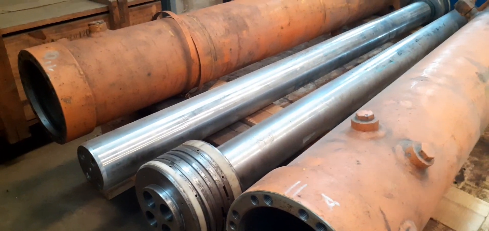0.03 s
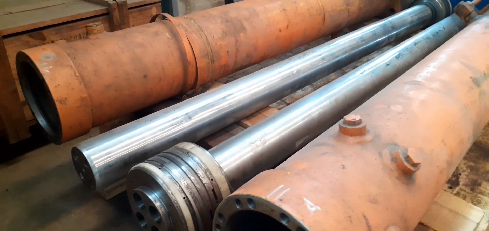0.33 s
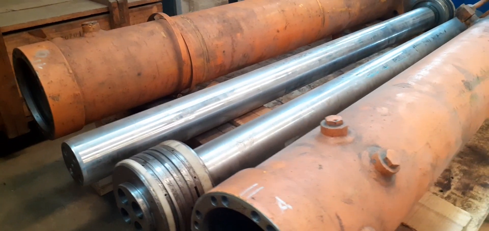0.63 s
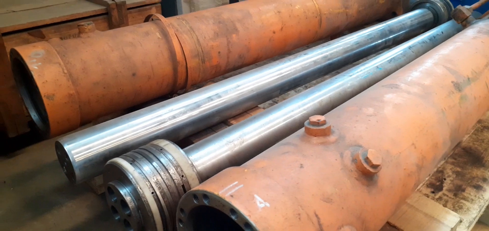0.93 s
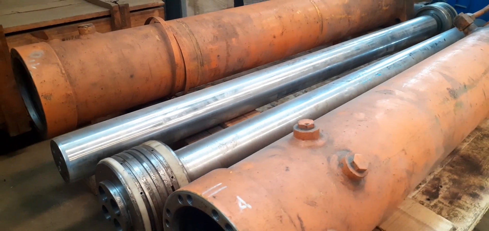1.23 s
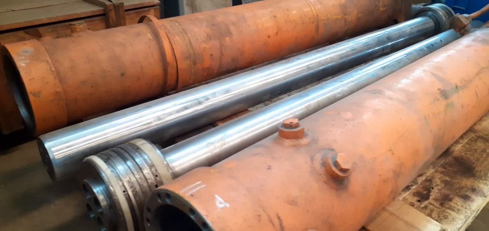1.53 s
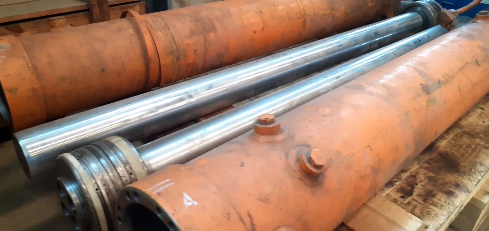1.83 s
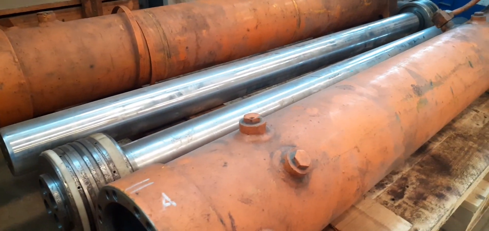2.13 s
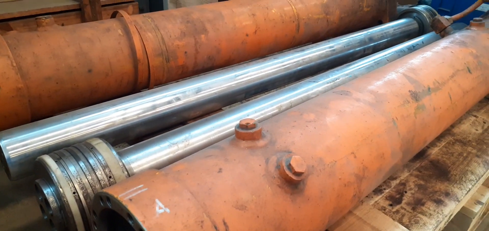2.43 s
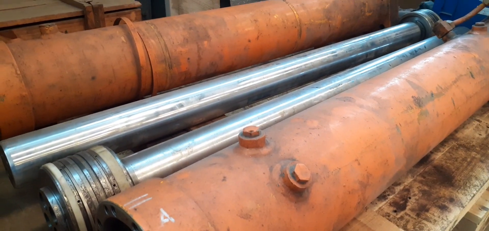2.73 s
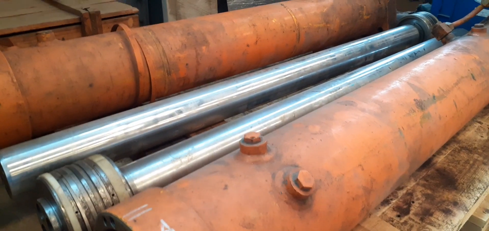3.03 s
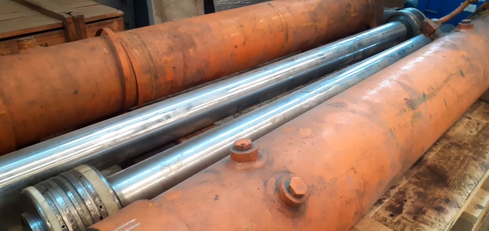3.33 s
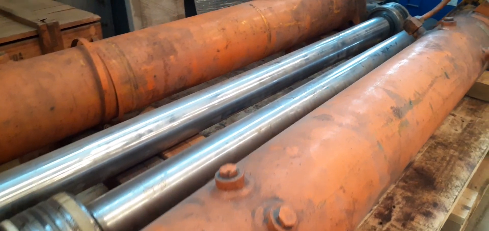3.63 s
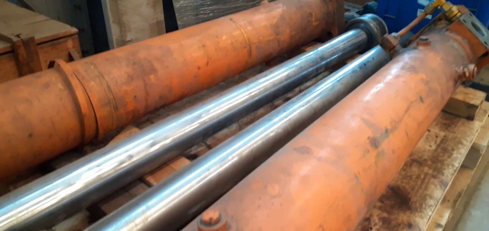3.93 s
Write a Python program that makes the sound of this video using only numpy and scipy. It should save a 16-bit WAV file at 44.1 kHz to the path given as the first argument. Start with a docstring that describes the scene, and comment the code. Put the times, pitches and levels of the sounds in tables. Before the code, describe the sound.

A low ventilation rumble runs for all four seconds in a metal workshop, wavering slightly and dipping briefly just after 2 seconds. Distant machines drone and motors hum with it, under faint air hiss, a weak fan tone and a thin high whine. A tiny tick sounds on the left at 0.2 seconds. Three very soft taps come from the right around 1.1 seconds, one from the left at 2.1.

```python
"""Metal workshop background

Ventilation rumbles in the hall's low resonances, air hisses above it, distant machines drone.
Motors hum, a fan sings its blade note, and a variable-speed drive whines near 4 and 8 kHz.
A tiny tick sounds at the left microphone port; three soft taps come from the right, one from the left."""
import sys
import numpy as np
from scipy.fft import rfft, irfft, next_fast_len
from scipy.io import wavfile
from scipy.ndimage import map_coordinates

SR = 44100
rng = np.random.default_rng(int(sys.argv[2]) if len(sys.argv) > 2 else 0)


def digitize_waveform(pressure):
    """Quantize a signal to 16-bit integers and store it at the path in sys.argv[1].

    Rows of a 2-D input are taken as channels; values are limited to [-1, 1].
    """
    field = np.atleast_2d(pressure).T
    bounded = np.clip(field, -1, 1)
    quanta = np.round(bounded * 32767).astype(np.int16)
    wavfile.write(sys.argv[1], SR, quanta)


N = 176400


def amp(db):
    """Decibels to gain."""
    return 10 ** (np.asarray(db) / 20)


def along(points, hz):
    """(hz, value) points read on a log axis."""
    knots_hz, values = np.transpose(points)
    return np.interp(np.log(hz + 1), np.log(knots_hz + 1), values)


def curve(points):
    """(time_s, value) points as one value per sample."""
    return np.interp(np.arange(N) / SR, *np.transpose(points))


def wobble(rate_hz):
    """Smooth random curve, rate_hz knots a second."""
    knots = rng.standard_normal(int(N * rate_hz / SR) + 4)
    return map_coordinates(knots, [np.arange(N) * rate_hz / SR], mode="nearest")


def filtered(x, response):
    """Apply a frequency response, with mirrored ends."""
    edge = SR // 4
    padded = np.pad(x, ((0, 0), (edge, edge)), mode="reflect")
    size = next_fast_len(padded.shape[1])
    hz = np.fft.rfftfreq(size, 1 / SR)
    return irfft(rfft(padded, size) * response(hz), size)[:, edge:edge + N]


def pan(pan_db):
    """Stereo gains; pan_db is left minus right."""
    return amp(np.array([[.5], [-.5]]) * pan_db)


# Left-right likeness at the microphone pair: freq_hz, correlation
COHERENCE = [(60, .97), (150, .95), (300, .92), (600, .8), (1200, .3), (3000, .3), (8000, .15), (15000, .1)]

def stereo_noise(gain):
    """Noise of rms 1 shaped by gain(hz); the bass is alike in both channels."""
    size = next_fast_len(N + SR // 2)
    hz = np.fft.rfftfreq(size, 1 / SR)
    angle = np.arccos(along(COHERENCE, hz)) / 2
    mid, side = rfft(rng.standard_normal((2, size))) * [np.cos(angle), np.sin(angle)]
    shaped = irfft(np.array([mid + side, mid - side]) * gain(hz), size)[:, :N]
    return shaped / np.sqrt(np.mean(shaped ** 2))


def fuzzy_tones(rows):
    """Tones blurred into narrow noise bands."""
    out = np.zeros((2, N))
    for pitch_hz, level_db, width_hz, pan_db in rows:
        band = stereo_noise(lambda hz: pan(pan_db) / (1 + ((hz - pitch_hz) / width_hz) ** 2) ** 1.46)
        out += amp(level_db) * band
    return out


# Stereo balance of the hall: freq_hz, pan_db
HALL_BALANCE = [(60, -3.5), (180, -0.6), (380, -5), (540, -0.5), (750, -5), (1000, -1.5), (1400, -5),
                (4000, -6.5), (8000, -4.5), (10000, -0.5), (12000, -9.5), (15000, -10.5)]

def hall_noise(spectrum):
    """Broad noise of rms 1, leaning right."""
    return stereo_noise(lambda hz: amp(along(spectrum, hz)) * pan(along(HALL_BALANCE, hz)))


# Rumble spectrum: freq_hz, relative_db
RUMBLE_SPECTRUM = [(20, -38), (31, -39), (40, -28.5), (50, -19), (65, -11.5), (80, -3), (95, -3),
                   (112, -6.5), (132, -13), (170, -31), (260, -48.5), (500, -77.5)]
# Rumble envelope: time_s, level_db
RUMBLE_ENVELOPE = [(0, -30), (.33, -25.5), (.66, -27), (.83, -23), (1.0, -30), (1.25, -24.5), (1.6, -29),
                   (1.9, -25.5), (2.05, -34.5), (2.22, -37), (2.35, -26.5), (2.48, -32), (2.72, -27),
                   (2.98, -32), (3.1, -27.5), (3.7, -30.5), (3.84, -27), (4, -35)]

def duct_rumble(flutter_db=.9):
    """Ventilation rumbles unsteadily in the hall's low resonances."""
    return amp(curve(RUMBLE_ENVELOPE) + flutter_db * wobble(17)) * hall_noise(RUMBLE_SPECTRUM)


# Air rush and top hiss spectra: freq_hz, relative_db
AIR_SPECTRUM = [(300, -12.5), (800, 2), (1200, 2), (1700, -1.5), (2250, -2), (2520, 0), (2800, -1.5),
                (3350, 2), (3550, 1), (3700, 4.5), (4300, -4.5), (4520, -1.5), (5000, -6.5), (6600, -8),
                (7250, -4.5), (8400, -9), (8720, -7.5), (9200, -19), (10000, -23), (12000, -34)]
HISS_SPECTRUM = [(7000, -30.5), (9000, -8), (10200, -5.5), (11200, -1), (12200, 0.5), (13500, -3),
                 (15700, -3)]
# Their envelopes: time_s, relative_db
AIR_ENVELOPE = [(0, -58), (.45, -58.5), (1.2, -58), (2, -60), (3.3, -59.5), (3.55, -58.5), (4, -58)]
HISS_ENVELOPE = [(0, -73), (.6, -72.3), (.86, -70.5), (1.1, -72.5), (1.35, -73), (1.5, -74.5), (2.5, -76),
                 (3.3, -74), (3.5, -71), (4, -72.5)]

def airflow(air_gain_db=4.5, hiss_gain_db=7, flutter_db=.7):
    """Ventilation air rushes with a slight flutter under a fine hiss."""
    air = amp(curve(AIR_ENVELOPE) + air_gain_db + flutter_db * wobble(14)) * hall_noise(AIR_SPECTRUM)
    hiss = amp(curve(HISS_ENVELOPE) + hiss_gain_db) * hall_noise(HISS_SPECTRUM)
    return air + hiss


# Drone and midrange swell spectra: freq_hz, relative_db
DRONE_SPECTRUM = [(60, -37), (120, -4.5), (165, 0.5), (212, -1), (262, -9.5), (300, -7), (338, -7),
                  (375, -15.5), (425, -23), (475, -18), (505, -20.5), (550, -16), (580, -23), (660, -24.5),
                  (740, -32), (1000, -36.5), (1500, -55), (3000, -77.5)]
SWELL_SPECTRUM = [(400, -27.5), (800, 5), (1100, 1), (1600, -11), (2300, -30)]
# Their envelopes: time_s, level_db
DRONE_ENVELOPE = [(0, -33.5), (.4, -34.5), (1.1, -35), (2, -35.5), (2.9, -35.5), (3.4, -34.5), (4, -35)]
SWELL_ENVELOPE = [(0, -62), (.7, -70), (1.1, -56.5), (1.3, -65), (1.6, -71), (4, -74)]

def distant_machines():
    """Machines drone across the hall; the midrange swells softly around the first taps."""
    drone = amp(curve(DRONE_ENVELOPE)) * hall_noise(DRONE_SPECTRUM)
    swell = amp(curve(SWELL_ENVELOPE)) * hall_noise(SWELL_SPECTRUM)
    return drone + swell


# Motor hums: pitch_hz, level_db, width_hz, pan_db
MOTOR_TONES = [(82.2, -35, 5.4, -1), (96.8, -34, 3.3, -3), (109.4, -37.5, 3.9, -1.5),
               (154.06, -43, 2.5, -4), (208.7, -44.5, 14, -2.5), (299.7, -45.5, 2.7, -0.5),
               (327.9, -49, 4.8, 2), (531.4, -63, 4.5, 11), (781, -70, 3.6, -2), (1477, -82.5, 2, -7),
               (3180, -80.5, 14, -11), (5467, -79, 4, 2.5)]

def motors(bass_hz=130, rumble_share=.6):
    """Motors hum; the bass tones follow a share of the rumble's swings in dB."""
    rumble_db = curve(RUMBLE_ENVELOPE)
    swing_db = rumble_share * (rumble_db - rumble_db.mean())
    bass = fuzzy_tones(row for row in MOTOR_TONES if row[0] < bass_hz)
    upper = fuzzy_tones(row for row in MOTOR_TONES if row[0] >= bass_hz)
    return amp(swing_db) * bass + upper


# Strongest drive sidebands: pitch_hz
SIDEBAND_PITCHES = [3838, 3982, 4153, 7676, 7941, 7990]
# Their shapes: base_level_db, width_hz, pan_db
SIDEBAND_SHAPES = [(-64.5, 13, -7), (-73, 16, -6), (-67, 10, -8), (-77.5, 16, -6), (-79, 14, -6),
                   (-78, 14, -7)]
# Surges of the lowest sideband: time_s, gain_db
SIDEBAND_SURGE = [(0, 6), (.25, 1), (.7, 3), (.97, 8.5), (1.25, 0), (2.15, 1), (2.4, 0.5), (3.7, 4), (4, 4)]
# Switching noise around the sidebands: pitch_hz, level_db, width_hz, pan_db
SWITCHING_FUZZ = [(3866, -66, 89, -4.5), (3950, -65.5, 50, -3.5), (4166, -65, 57, -11),
                  (4200, -73, 32, -5.5), (7620, -72, 130, -6), (7910, -65, 290, -9)]

def drive_whine(flutter_db=1):
    """A variable-speed drive's switching makes narrow sidebands in fuzz; the lowest surges."""
    lowest, *others = [(hz, *shape) for hz, shape in zip(SIDEBAND_PITCHES, SIDEBAND_SHAPES)]
    surge_db = curve(SIDEBAND_SURGE) + flutter_db * wobble(6.3)
    return amp(surge_db) * fuzzy_tones([lowest]) + fuzzy_tones(others + SWITCHING_FUZZ)


# Blade harmonics 1 to 4: base_level_db, pan_db
BLADE_HARMONICS = [(-58.5, 4.5), (-77, -11.5), (-70, -5), (-77, -13)]
# Fades of harmonics 1 and 3: time_s, gain_db
HARMONIC_1_FADE = [(0, 3), (.5, 1.5), (1.5, 0), (2.3, -3), (2.8, 0), (4, -2.5)]
HARMONIC_3_FADE = [(0, 3), (.6, 4), (1, -2.5), (1.9, -1.5), (2.6, 1), (3.1, 3), (3.5, -4.5), (3.9, -1.5)]

def fan(blade_hz=637.8, drift=.0004):
    """Blade note; each harmonic fades on its own as the microphone moves through the hall."""
    phase = 2 * np.pi * np.cumsum(blade_hz * (1 + drift * wobble(5.17))) / SR
    fades_db = [curve(HARMONIC_1_FADE), 0, curve(HARMONIC_3_FADE), 0]
    out = np.zeros((2, N))
    for k, ((level_db, pan_db), fade_db) in enumerate(zip(BLADE_HARMONICS, fades_db), 1):
        flutter_db = wobble(3.3) + np.array([wobble(1.3), wobble(3.4)])  # shared + per channel
        tone = np.sqrt(2) * np.sin(k * phase + rng.uniform(0, 2 * np.pi))
        out += amp(level_db + fade_db + flutter_db) * pan(pan_db) * tone
    return out


def ring(start_s, pitch_hz, level_db, t60_s):
    """One decaying sine mode."""
    t = np.maximum(np.arange(N) / SR - start_s, 0)
    return amp(level_db - 60 * t / t60_s) * np.sin(2 * np.pi * pitch_hz * t)


# Soft taps: start_s, relative_db, pan_db
TAP_HITS = [(1.079, -45, -8), (1.130, -41, -8), (1.215, -39.5, -9), (2.102, -45, 7)]
# Modes of the tapped object: pitch_hz, relative_db, t60_s
OBJECT_MODES = [(870, -3, 0.039), (1150, -7, 0.032), (1360, 6.5, 0.013), (1640, -5.5, 0.02)]

def taps(gain_db=-7, scatter_db=1.5):
    """Light contacts ring a well damped object."""
    out = np.zeros((2, N))
    for start_s, hit_db, pan_db in TAP_HITS:
        modes = sum(ring(start_s, hz, db + rng.normal(0, scatter_db), t60_s)
                    for hz, db, t60_s in OBJECT_MODES)
        out += amp(hit_db + gain_db) * pan(pan_db) * modes
    return out


def tick():
    """One sharp snap at the left port only."""
    snap = ring(start_s=.1793, pitch_hz=4040, level_db=-21, t60_s=.00067)
    return np.array([snap, np.zeros(N)])


def scene(left_lead_s=.00014):
    """The hall, reaching the left port slightly earlier, plus the close tick."""
    hall = duct_rumble() + airflow() + distant_machines() + motors() + drive_whine() + fan() + taps()
    advance_s = np.array([[.5], [-.5]]) * left_lead_s
    return tick() + filtered(hall, lambda hz: np.exp(2j * np.pi * hz * advance_s))


def record(dry, fade_s=.006, cutoff_hz=15750):
    """Click-free fades at both ends, then a brick-wall low-pass."""
    t = np.arange(N) / SR
    fade = np.clip(np.minimum(t, t[::-1]) / fade_s, 0, 1)
    return filtered(dry * fade, lambda hz: hz < cutoff_hz)


dry = scene()
out = record(dry)
digitize_waveform(out)
```